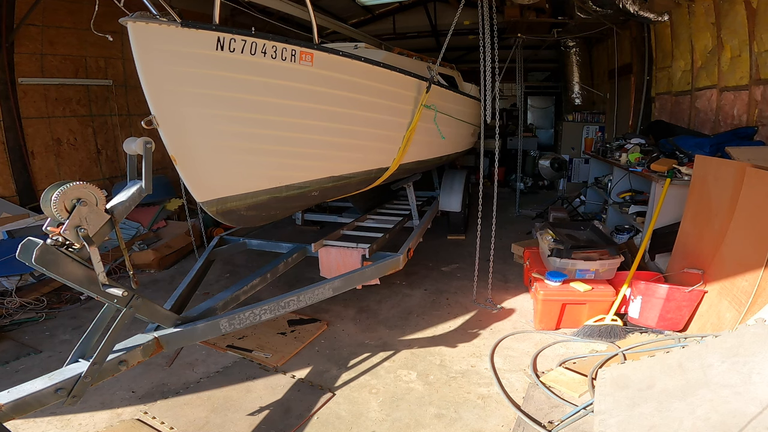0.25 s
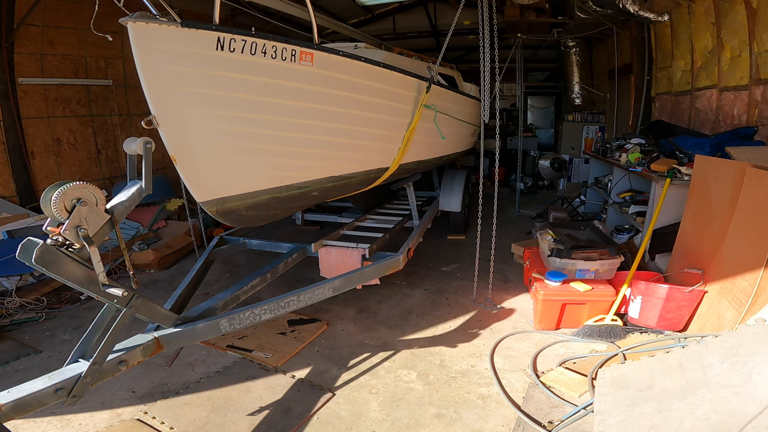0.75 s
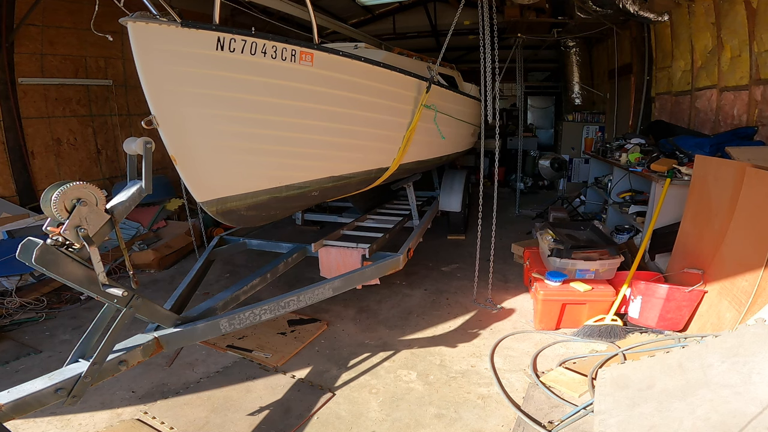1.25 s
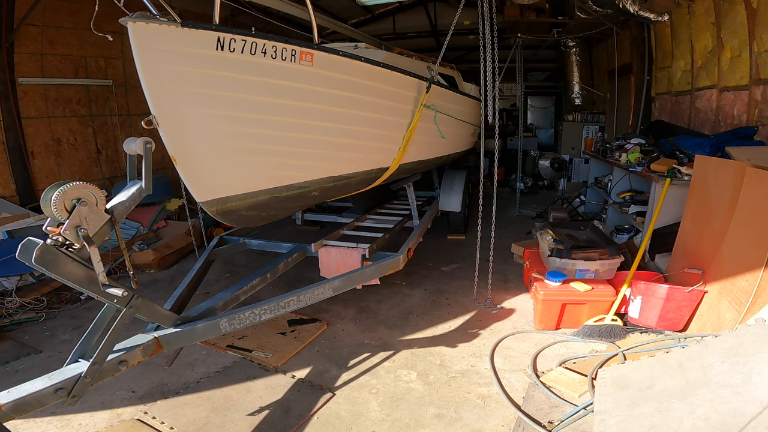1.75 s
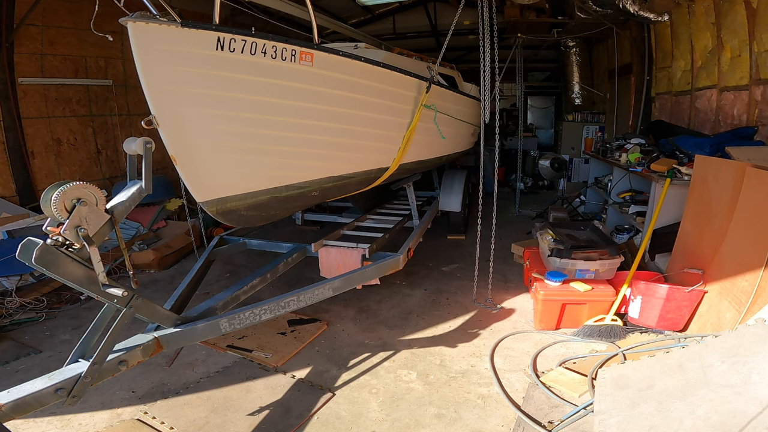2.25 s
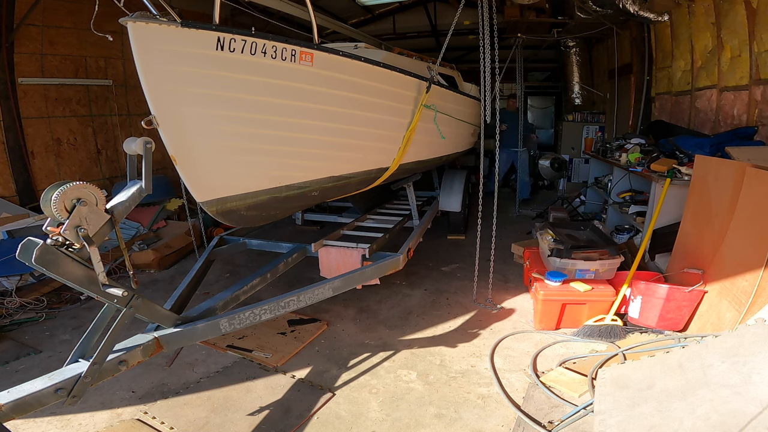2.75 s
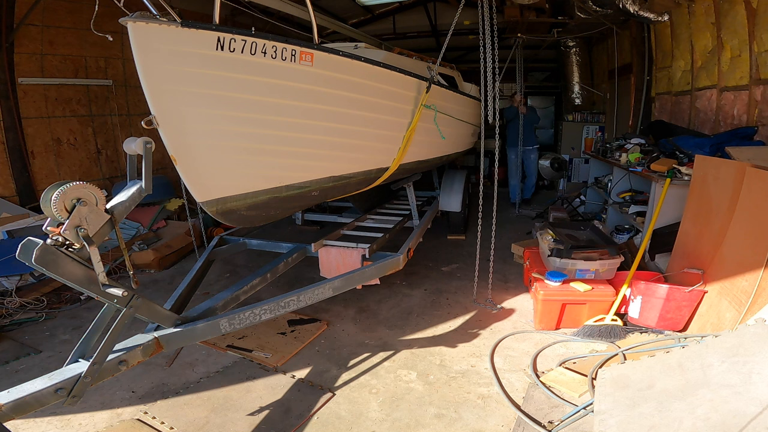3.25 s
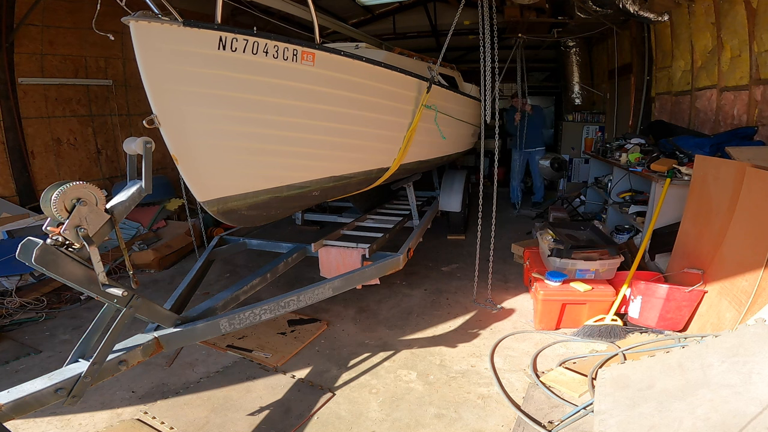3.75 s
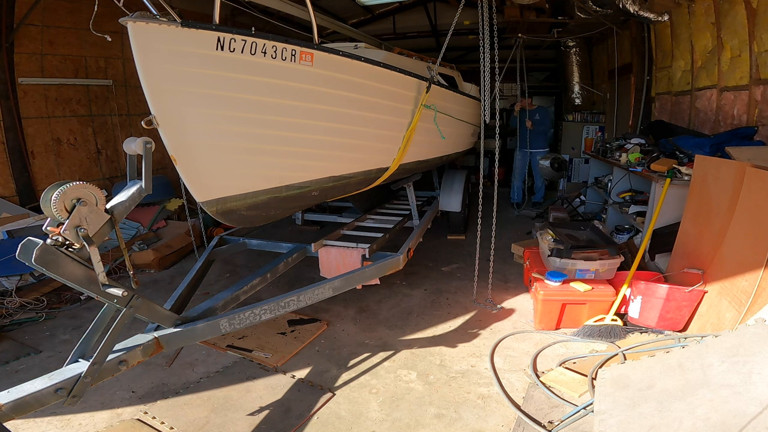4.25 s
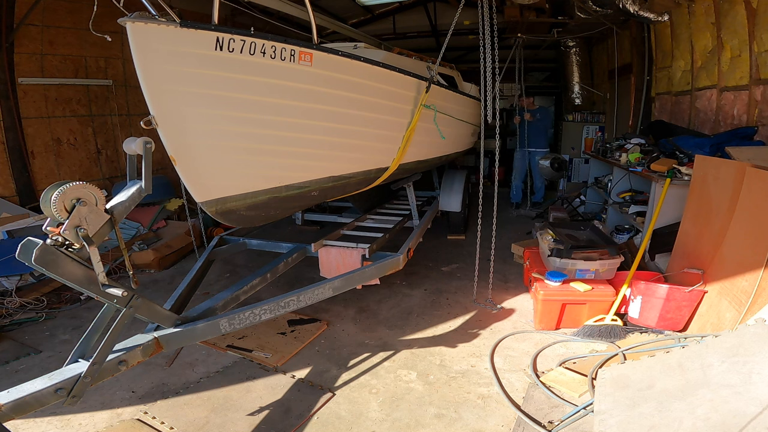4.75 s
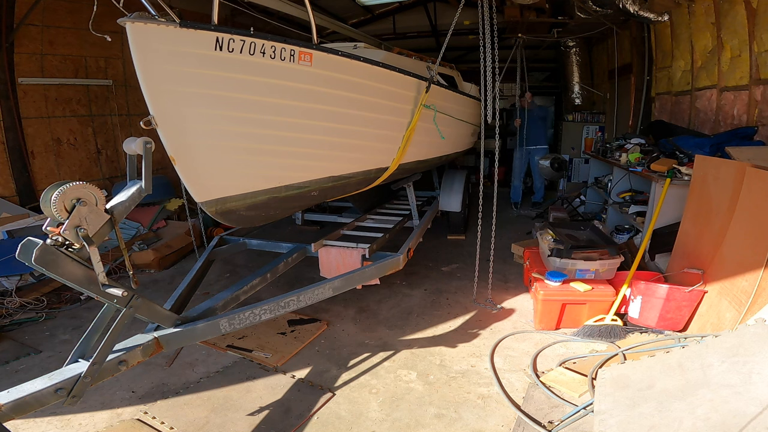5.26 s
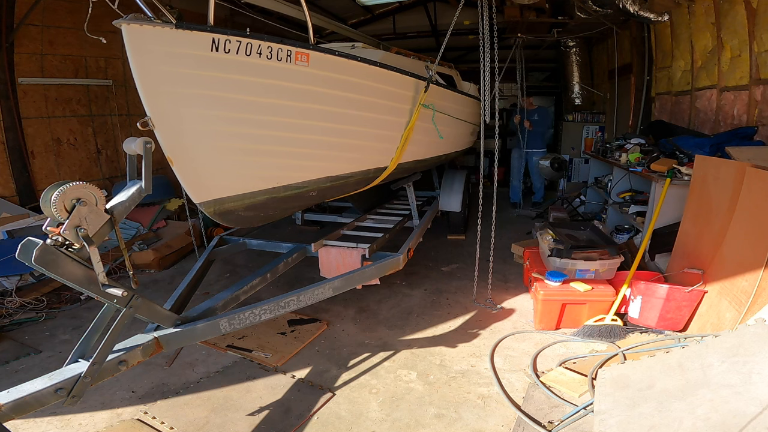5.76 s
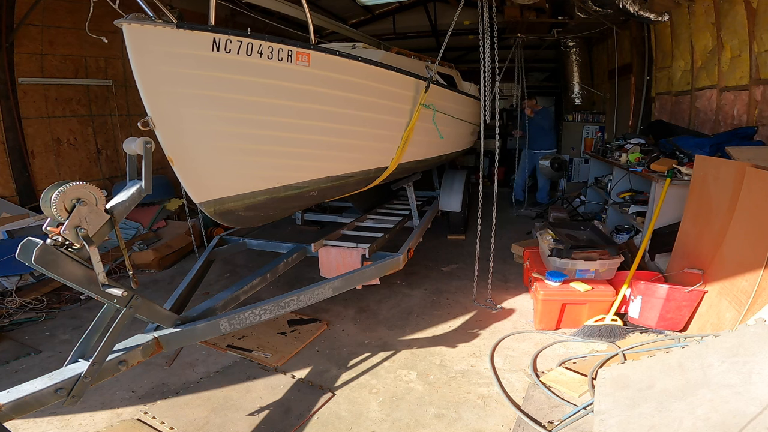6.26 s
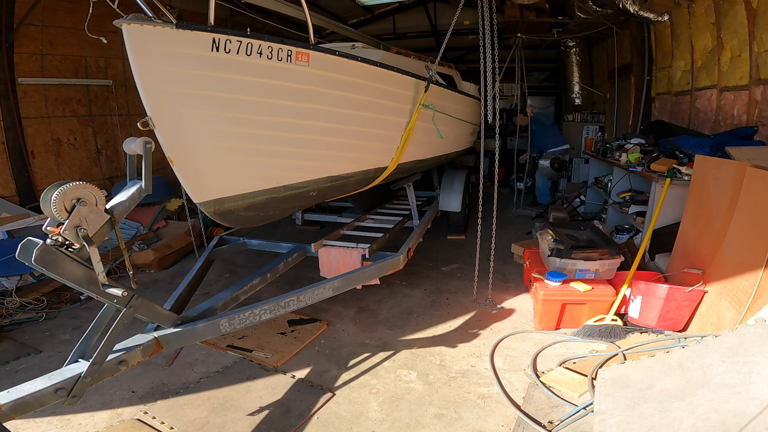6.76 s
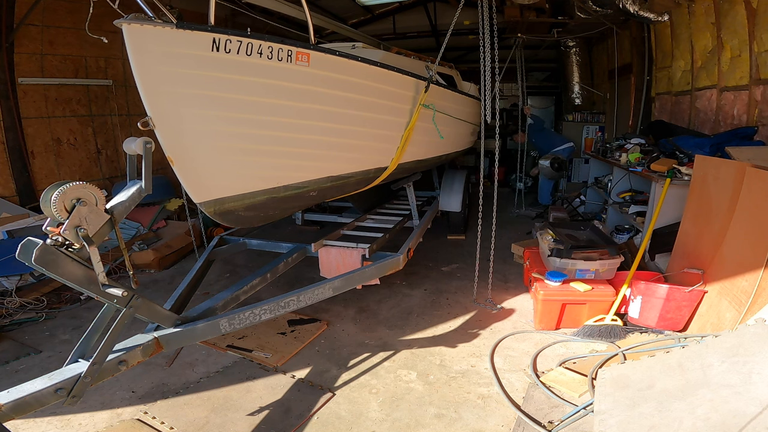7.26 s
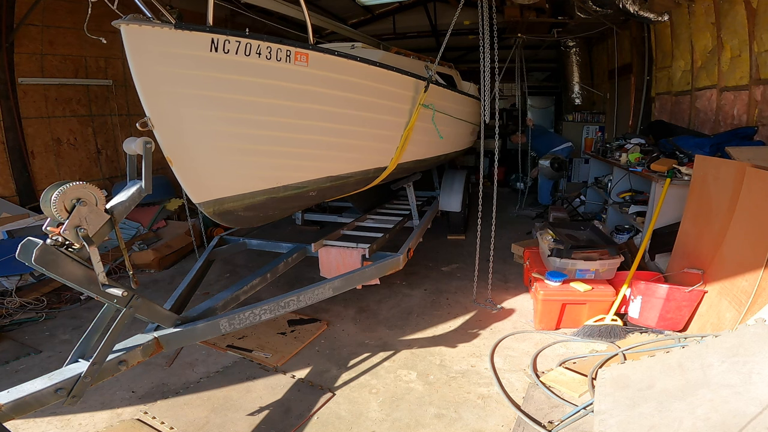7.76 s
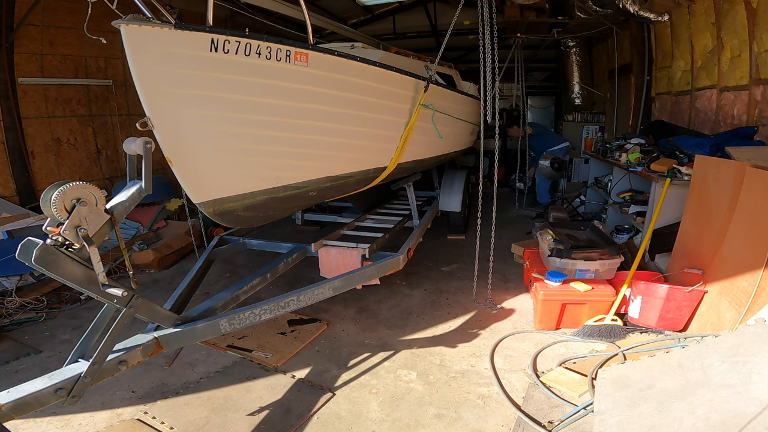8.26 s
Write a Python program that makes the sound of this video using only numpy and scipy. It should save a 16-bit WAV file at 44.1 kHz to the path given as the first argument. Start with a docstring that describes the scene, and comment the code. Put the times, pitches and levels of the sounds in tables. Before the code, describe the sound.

Faint gritty footsteps, hollow knocks and the clatter of a dropped board come from the back of a shed, with a short echo. A heavily loaded chain hoist then runs near the microphone: three quick pulls of steel rattle and ratchet clicking, with clinks and heavy clunks shaking the beam. A few distant scuffs fill a pause before one last short pull and clunk. A low rumble and hum lie underneath throughout.

```python
"""Chain hoist in a boat shed

Close to the microphone a hand chain hoist, holding a boat, is hauled four times. The chain's speed drives
the rattle of links on the wheel, the ticks of the pawl and the ring of housing and beam; the load settles
with a clunk. Far back, shoes scuff, wood knocks and, before the first haul, a board slaps down and
bounces. A low hum and rumble fill the cluttered shed."""
import sys
import numpy as np
from scipy import signal
from scipy.fft import rfft, irfft, next_fast_len
from scipy.io import wavfile
from scipy.ndimage import uniform_filter1d

SR = 44100
rng = np.random.default_rng(int(sys.argv[2]) if len(sys.argv) > 2 else 0)


def wrap_up_sound(samples):
    """Save the sound to the file named by the first command line argument, as 16-bit audio."""
    columns = np.atleast_2d(samples).T
    # keep every value between -1 and 1, then stretch to whole-number steps
    tamed = np.clip(columns, -1, 1)
    steps = np.round(tamed * 32767).astype(np.int16)
    wavfile.write(sys.argv[1], SR, steps)


N = 375732
TIME = np.arange(N) / SR

# Pulls on the chain; levels in all tables are relative: (start [s], length [s], speeding up [s],
# slowing [s], full speed [teeth/s], pawl's place on its tooth [0-1], rattle [dB],
# treble tilt [dB/octave], housing ring [dB], beam shake [dB])
HAULS = [(3.639, 0.27, 0.039, 0.024, 54.2, 0.88, -22.5, -7, -9.5, -24.5),
         (4.001, 0.54, .045, 0.026, 36.4, 0.67, -26, 1, -8, -33.5),
         (5.288, 0.5, .16, 0.041, 52.4, .65, -22.5, 0.9, -8, -31),
         (7.609, 0.3, 0.043, .032, 35.7, 0.66, -24.5, 1, -8.5, -30)]
# The chain snaps taut or swings against the hoist:
# (time [s], level [dB], beam thump [dB], time to the shudder's peak [s], clink pitch [Hz])
CLUNKS = [(3.39, -52, -43.5, 0.019, 1310), (4.46, -51, -32.5, 0.042, 1372),
          (4.611, -30.5, -25.5, 0.032, 1377), (4.845, -50, -48, 0.024, 4030),
          (4.975, -42.5, -51, .03, 3390), (5.118, -51.5, -50, .03, 5080), (5.16, -42.5, -37.5, 0.056, 4300),
          (5.943, -30, -25, .028, 1440), (6.272, -59, -37.5, 0.012, 580), (8.064, -34, -31.5, 0.031, 1332),
          (8.186, -57, -48, .03, 3160), (8.234, -48, -45.5, 0.033, 4700)]
# Resonances of housing and wheel: (frequency [Hz], t60 [s], level [dB])
HOIST_MODES = [(641, .15, -2), (680, .097, -2), (706.3, 0.13, -2.5), (1265, 0.18, 0), (1293.5, .03, 1),
               (1372, .04, -12.5), (1960, 0.025, -1), (2237, 0.073, -3), (2810, 0.11, -10.5),
               (3075, 0.062, -13), (3140, 0.05, -1), (3430, 0.064, -1.5), (3550, .16, -7), (3724, .06, -14),
               (4220, .12, -11), (4480, .06, -7), (4380, 0.14, -14), (4900, 0.11, -10), (5180, .12, -7.5),
               (6000, 0.13, -3.5), (6660, 0.061, -12.5)]
# Stereo width of the shed at the microphone: (frequency [Hz], side minus mid [dB])
WIDTH = [(60, -26), (130, -17), (260, -11.5), (1100, -8.5), (2100, -7), (3800, -5), (7000, -11.5),
         (12000, -43)]


def hoist():
    """Links tumble over the wheel and the hard pawl ticks brightly; both ring the housing."""
    # Spectrum of a steel link's clack: (frequency [Hz], level [dB])
    link_spectrum = [(200, -5.5), (500, -20.5), (900, -8.5), (1500, -9), (2600, -4.5), (3600, 2),
                     (4700, 2.5), (5600, 0), (7000, 2), (8700, -5.5), (9500, -6.5), (10500, -10),
                     (11100, -17), (12000, -21)]
    housing = ring(HOIST_MODES)
    links = chatter(rate=550, spread_db=-0.5, t60=0.089)
    contacts, drive = 0, 0
    for start, length, speeding, slowing, teeth_per_s, tooth, db, tilt_db, ring_db, _ in HAULS:
        pace = chain_speed(start, length, speeding, slowing)
        rattle = undb(db - 1) * pace ** 1.23 * links
        pawl = ratchet(pace, teeth_per_s, tooth)
        clack = undb(6.5) * colour(rattle, link_spectrum, tilt_db - 1.34, pivot_hz=4030)
        tick = undb(5.5) * colour(pawl, link_spectrum, tilt_db + 4, pivot_hz=4100)
        contacts += clack + tick
        drive += undb(ring_db) * (rattle + pawl)
    bearing = undb(1.7 * walk(26))  # the chain bears on the housing unevenly
    return contacts + through(bearing * drive, housing)


def chain_speed(start, length, speeding, slowing, lag_s=0):
    """Speed 0-1 in one haul: the hand jerks the chain, gains the rest and stops smoothly."""
    jerk_share = 0.53
    t = TIME - start - lag_s
    rise = 1 - (1 - jerk_share) * np.exp(-np.maximum(t, 0) / speeding)
    stop = (1 - np.tanh((t - length) / slowing / 2)) / 2
    return (t >= 0) * rise * stop


def chatter(rate, spread_db, t60):
    """Many small collisions of links, each with its own short crack of noise."""
    power = through(grains(rate, spread_db) ** 2, fade(t60) ** 2)
    return unit(np.sqrt(np.maximum(power, 0)) * rng.standard_normal(N))


def ratchet(pace, teeth_per_s, tooth):
    """The pawl ticks at the first jerk, then drops over every passing tooth, louder with speed."""
    passed = np.floor(tooth + teeth_per_s * np.cumsum(pace) / SR)
    drops = np.r_[np.argmax(pace > 0), np.flatnonzero(np.diff(passed))]
    scatter_db = 0.1 * rng.standard_normal(N)[:len(drops)]
    ticks = np.zeros(N)
    ticks[drops] = pace[drops] ** 0.95 * undb(-2 - scatter_db)
    power = through(ticks ** 2, impulse(fade(t60=0.045)) ** 2)
    return np.sqrt(np.maximum(power, 0)) * rng.standard_normal(N)


def clunks():
    """Single jolts of the chain: a knock, a brief jingle of links, one clink and the housing's ring."""
    # Spectrum of a jolt through the hoist body: (frequency [Hz], level [dB])
    jolt_spectrum = [(100, -11), (300, -3), (560, 4), (850, -9), (1350, -2), (1900, -5), (2800, -5),
                     (4700, 2), (6500, -4.5), (8500, -9), (10300, -14), (11000, -22), (12000, -27)]
    blows, clinks = np.zeros(N), np.zeros(N)
    for s, db, *_, hz in CLUNKS:
        knock = burst(t60=0.032)
        jingle = undb(3.5) * burst(t60=0.41)
        add(blows, s, undb(db + 26) * impulse(knock + jingle))
        clink = ring([(hz, 0.2, 0), (hz * 1.06, 0.11, -1), (hz * 0.83, 0.09, -3)])
        add(clinks, s, undb(db + 24) * clink)
    return undb(8.5) * colour(blows, jolt_spectrum) + through(blows, ring(HOIST_MODES)) + clinks


def beam():
    """The running chain shakes the loaded beam, which booms; each jolt adds a shove and a shudder."""
    # Resonances of beam and hull: (frequency [Hz], t60 [s], level [dB])
    beam_modes = [(28.15, 0.16, -9), (41, 0.22, -6), (62.6, .12, -27), (83.2, .46, -0.5), (88.6, .095, -8),
                  (124.9, 0.17, -7), (150, .08, -9.5), (187, 0.088, -13), (248, 0.048, -11.5),
                  (292.7, 0.075, -8.5), (320.3, 0.12, -7), (345, .09, -14.5)]
    shaking = undb(-48.5) * ((TIME > 3.3) & (TIME < 6.6))  # the hanging boat keeps the beam trembling
    for start, length, speeding, slowing, *_, shake_db in HAULS:
        pace = chain_speed(start, length, speeding, slowing, lag_s=0.021)  # the heavy beam follows late
        shaking = np.hypot(shaking, undb(shake_db) * pace)
    shoves, shove = np.zeros(N), fade(t60=0.0066)
    for s, _, thump_db, peak_s, _ in CLUNKS:
        add(shoves, s, undb(thump_db + 35) * shove / shove.sum())
        age = np.maximum(TIME - s, 0) / peak_s
        shudder = undb(thump_db - 2) * age * np.exp(1 - age)
        shaking = np.hypot(shaking, shudder)
    return through(shoves + shaking * grains(rate=400, spread_db=2), ring(beam_modes))


def scuffs():
    """Short gritty scuffs: tiny contacts crunch for the length of each slide, then die away."""
    # Shoes on concrete and a hand grabbing the chain:
    # (time [s], length [s], level [dB], tilt [dB/octave])
    slides = [(0, 0.019, -49.5, 7), (0.18, 0.053, -56.5, 0), (0.281, 0.06, -37.5, 3),
              (0.432, 0.026, -46, 4), (0.502, .034, -41, .5), (0.54, 0.027, -38.5, -1.5),
              (0.593, 0.03, -40, 4.5), (0.682, .15, -55.5, -1.5), (1.067, 0.12, -51.5, 2),
              (1.17, 0.044, -38, 2.5), (1.575, 0.045, -47.5, -1.5), (1.619, .08, -51, 1),
              (1.705, 0.032, -41.5, 1), (1.895, 0.076, -51.5, -0.5), (2.032, 0.032, -46.5, 0.5),
              (2.119, 0.14, -57.5, 5.5), (2.698, 0.017, -59.5, 5.5), (2.787, 0.051, -60.5, 2.5),
              (3.172, 0.026, -45, 2.5), (3.193, 0.021, -36, 1.5), (3.37, .03, -53, 4),
              (3.539, 0.065, -40, 3), (5.891, 0.084, -41, -1.5), (6.004, 0.044, -45.5, 0.5),
              (6.198, 0.3, -60, 5), (6.708, 0.23, -57, 4.5), (6.781, 0.13, -42.5, .5),
              (7.128, 0.17, -61.5, 2), (7.55, 0.15, -53.5, 0.5), (8.361, 0.074, -55.5, 6),
              (8.468, 0.028, -49, -4.5)]
    # Spectrum of the gritty crunch: (frequency [Hz], level [dB])
    grit_spectrum = [(100, -12), (400, -2), (800, 0.5), (1400, 3.5), (2200, 2), (3200, -2.5), (5000, -6.5),
                     (7200, -13), (8500, -22), (12000, -33.5)]
    rise_share, release_s = 0.058, 0.011
    grit = grains(rate=2500, spread_db=4)
    out, t = np.zeros(N), TIME[:SR // 2]
    for s, length, db, tilt_db in slides:
        start = rng.integers(N - len(t))
        crunch = unit(colour(grit[start:start + len(t)], grit_spectrum, tilt_db, pivot_hz=500))
        swell = 1 - np.exp(-t / (rise_share * length))
        release = np.exp(-np.maximum(t - length, 0) / release_s)
        add(out, s, undb(db + 2) * crunch * swell * release)
    return out


def knocks():
    """Short knocks and the falling board, each ringing hollow, some dull and some bright."""
    # Knocks on wood and floor: (time [s], level [dB], tilt [dB/octave], hollow pitch [Hz])
    blows = [(.548, -40, -5, 1750), (1.178, -40.5, 6.5, 2250), (1.19, -35, 8, 2345),
             (1.713, -42, -5.5, 540), (1.727, -44.5, -4, 680), (1.9, -44, 1.5, 1160),
             (2.127, -49, -1.5, 528), (2.789, -50, 1, 520), (3.389, -47, 0, 1304),
             (5.875, -39.5, -11.5, 397), (6.261, -43, -13, 260), (6.285, -41, -11.5, 292),
             (6.46, -50, -8.5, 482), (8.186, -50.5, 1, 580), (8.476, -45.5, .5, 1570)]
    # Spectrum of a struck board: (frequency [Hz], level [dB])
    board_spectrum = [(25, 1), (60, -12), (200, 1.5), (500, -1), (1000, -0.5), (1600, -5), (2400, -8.5),
                      (3500, -16.5), (5000, -24.5), (8000, -39.5), (12000, -65)]
    out = np.zeros(N)
    for s, db, tilt_db, hz in blows + falling_board(s=2.316, db=-32, tilt_db=0.5, landings=3):
        crack = impulse(colour(burst(t60=0.029), board_spectrum, tilt_db, pivot_hz=400))
        hollow = ring([(hz, 0.14, 0), (hz * 1.2, 0.08, -3)])
        add(out, s, undb(db + 31) * (crack + undb(-4) * hollow))
    return out


def falling_board(s, db, tilt_db, landings):
    """Blows of a board landing flat, corner after corner, each bounce shorter and weaker."""
    # The hollow note that each corner brings out: (pitch [Hz])
    corner_hz = [1408, 1023, 577, 915]
    corner_gap_s, first_flight_s, flight_share, loss_db = 0.008, 0.052, 0.7, 4
    blows = []
    for bounce in range(landings):
        shrink = flight_share ** bounce
        for corner, hz in enumerate(corner_hz):
            blows.append((s + corner * corner_gap_s * shrink, db - bounce * loss_db, tilt_db, hz))
        s += first_flight_s * shrink
    return blows


def room_tone():
    """Low rumble of the air, a wavering hum and a deeper drone, a little to the left."""
    # Spectrum of the shed's air: (frequency [Hz], level [dB])
    air_spectrum = [(20, -11.5), (35, -1.5), (60, -0.5), (110, -3.5), (170, -5.5), (260, -6.5),
                    (330, -16.5), (450, -19), (800, -26), (1200, -23.5), (2500, -36), (5000, -41),
                    (8000, -47), (12000, -60)]
    # Tones of the hum: (frequency [Hz], level [dB], waver [dB])
    hum_tones = [(224.3, -53, 0), (660, -74.5, 1)]
    # The drone comes and goes: (time [s], level [dB])
    drone_levels = [(0, -57), (1.1, -57.5), (1.6, -57.5), (2.5, -49), (2.8, -62.5), (3.4, -47), (4.6, -51),
                    (7.3, -73), (8.5, -48)]
    drone_hz = 116.8
    mid, side = (unit(colour(rng.standard_normal(N), air_spectrum)) for _ in range(2))
    side = colour(side, WIDTH)
    hum = 0
    for hz, db, waver_db in hum_tones:
        level = undb(db + waver_db * walk(3.1))
        hum += level * np.sin(2 * np.pi * hz * TIME + 0.76 * walk(3))
    drone_db = np.interp(TIME, *np.transpose(drone_levels)) + 2 * walk(20)
    drone = undb(drone_db) * np.sin(2 * np.pi * drone_hz * TIME + 1.3 * walk(3.7))
    air = undb(-49.5 + 2.6 * walk(2.57)) * np.array([mid + side, mid - side])
    return pan(air + np.sqrt(2) * (hum + drone), left_db=0.7)


def shed():
    """Mid and side responses of the shed: octave bands of dense echoes, each with its own decay."""
    # Reverberation of the shed: (frequency [Hz], t60 [s])
    decay_times = [(100, 0.41), (500, 0.15), (1400, 0.2672), (3700, 0.32), (10000, 0.3)]
    build_up_s = 0.0026
    hz = np.arange(SR // 4 + 1) * 2
    centres = 62.5 * 2 ** np.arange(9)
    tails = 0
    for centre, share in zip(centres, np.eye(len(centres))):
        band = np.sqrt(at(np.c_[centres, share], hz))
        echoes = irfft(rfft(rng.standard_normal((2, SR // 2))) * band)
        tails += echoes * fade(at(decay_times, centre))
    tails *= 1 - np.exp(-TIME[:SR // 2] / build_up_s)
    return impulse(tails[0]), impulse(tails[1])


def place(x, wet_db, side_db):
    """Direct sound in the middle plus the shed's echoes; wetter is farther from the microphone."""
    mid, side = shed()
    wet = undb(wet_db)
    centre = x + wet * through(x, mid)
    spread = wet * undb(side_db) * colour(through(x, side), WIDTH)
    return np.array([centre + spread, centre - spread]) / np.sqrt(1 + wet ** 2)


def pan(pair, left_db):
    """Make the left channel louder than the right."""
    return pair * undb(np.array([[left_db], [-left_db]]) / 2)


def undb(db):
    """Decibels to gain."""
    return 10 ** (np.asarray(db) / 20)


def unit(x):
    """Scale to rms 1."""
    return x / np.sqrt(np.mean(x ** 2))


def impulse(x):
    """Scale a response to energy 1."""
    return x / np.sqrt(np.sum(x ** 2))


def at(points, hz):
    """Read a curve on a log-frequency axis."""
    freqs, values = np.transpose(points)
    return np.interp(np.log(np.maximum(hz, 1)), np.log(freqs), values)


def colour(x, points, tilt_db=0, pivot_hz=1):
    """Causal filter with the given spectrum, tilted by tilt_db per octave above the pivot."""
    size = next_fast_len(len(x) + 4096) * 2
    hz = np.arange(size // 2 + 1) * SR / size
    db = at(points, hz) + tilt_db * np.log2(np.maximum(hz / pivot_hz, 1))
    cepstrum = irfft(np.log(undb(db)))
    cepstrum[1:size // 2] *= 2  # minimum phase: nothing rings ahead of a blow
    cepstrum[size // 2 + 1:] = 0
    return irfft(rfft(x, size) * np.exp(rfft(cepstrum)))[:len(x)]


def through(x, response):
    """Pass a sound through an impulse response."""
    return signal.oaconvolve(x, response)[:len(x)]


def add(out, s, x):
    """Mix a sound in at s seconds."""
    i = max(int(s * SR), 0)
    out[i:i + len(x)] += x[:N - i]


def fade(t60):
    """Half a second of exponential decay."""
    return np.exp(-np.log(1000) * TIME[:SR // 2] / t60)


def burst(t60):
    """A decaying spray of tiny contacts."""
    return impulse(rng.standard_normal(SR // 2) * fade(t60))


def ring(modes):
    """A struck body's response: one decaying sine of random polarity for each mode."""
    response = 0
    for hz, t60, db in modes:
        mode = impulse(fade(t60) * np.sin(2 * np.pi * hz * TIME[:SR // 2]))
        response += undb(db) * mode * rng.choice([-1, 1])
    return impulse(response)


def grains(rate, spread_db):
    """Random small impacts of uneven size, about `rate` a second."""
    hits = (rng.random(N) < rate / SR) * rng.choice([-1, 1], N)
    sizes = undb(spread_db * np.clip(rng.standard_normal(N), -2, 2))
    return unit(hits * sizes)


def walk(rate):
    """Smooth random drift of rms 1, with `rate` new values a second."""
    hold = int(SR / rate)
    steps = np.repeat(rng.standard_normal(N // hold + 1), hold)
    return unit(uniform_filter1d(uniform_filter1d(steps, hold), hold)[:N])


def scene():
    """The hoist is close to the microphone; scuffs and knocks sound far back, with much more echo."""
    near = place(hoist() + clunks(), wet_db=-7, side_db=4.5)
    boom = pan(place(beam(), wet_db=-11.5, side_db=5.5), left_db=1.26)
    far = pan(place(scuffs() + knocks(), wet_db=0, side_db=-1.5), left_db=1.0)
    return near + boom + far + room_tone()


def record(dry):
    """A steep low-pass cuts the top of the microphone signal."""
    top_hz = 11950
    return signal.sosfilt(signal.ellip(10, 0.2, 80, top_hz, fs=SR, output="sos"), dry)


dry = scene()
out = record(dry)
wrap_up_sound(out)
```